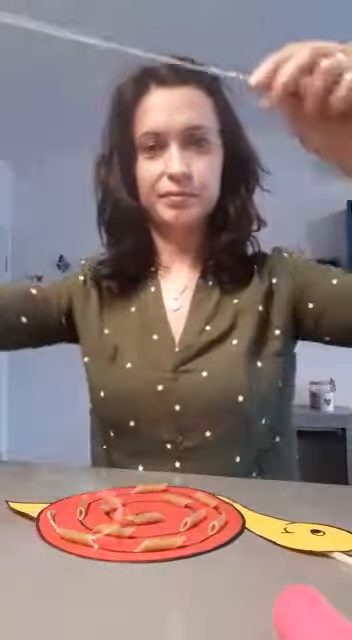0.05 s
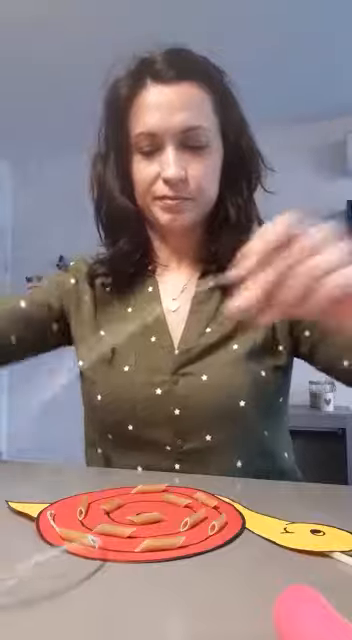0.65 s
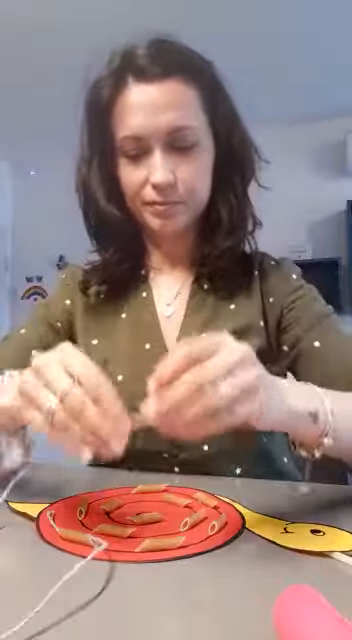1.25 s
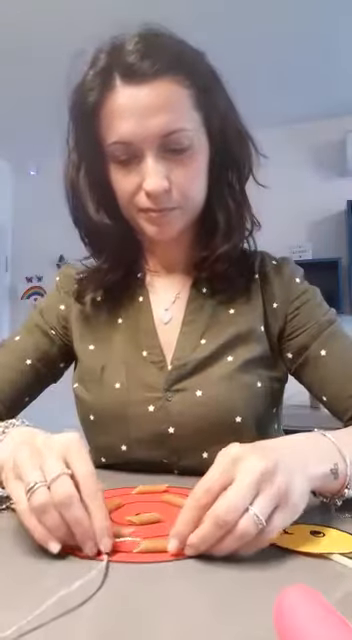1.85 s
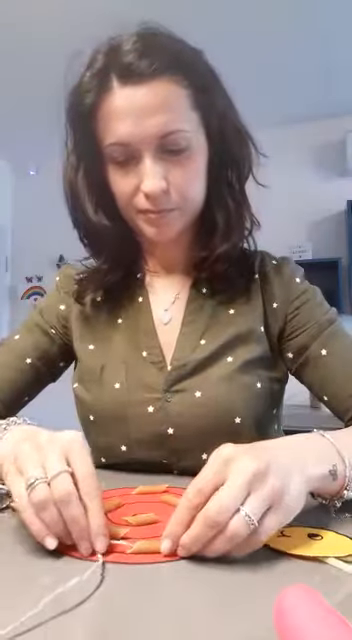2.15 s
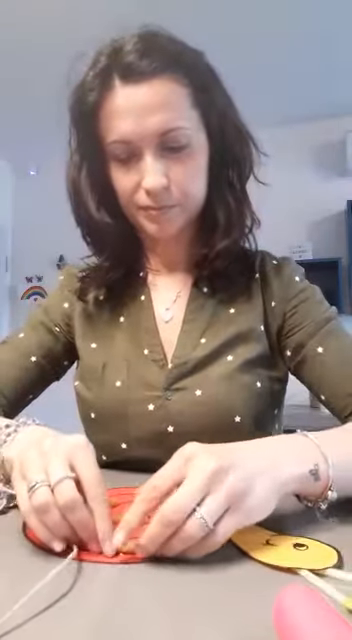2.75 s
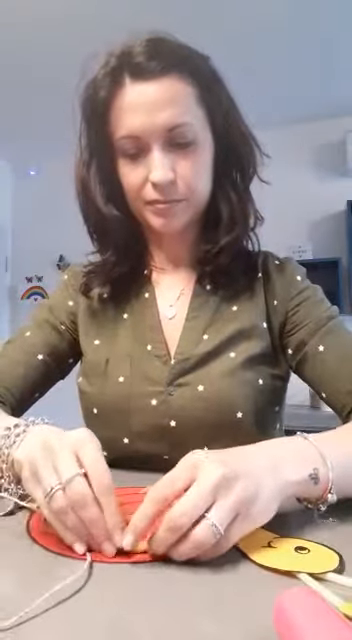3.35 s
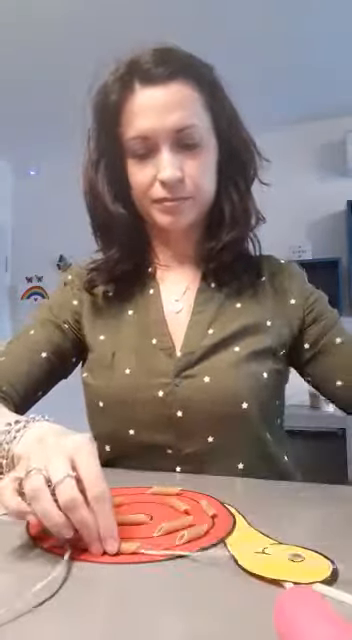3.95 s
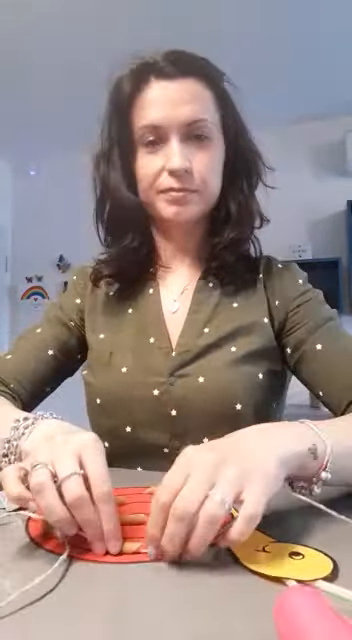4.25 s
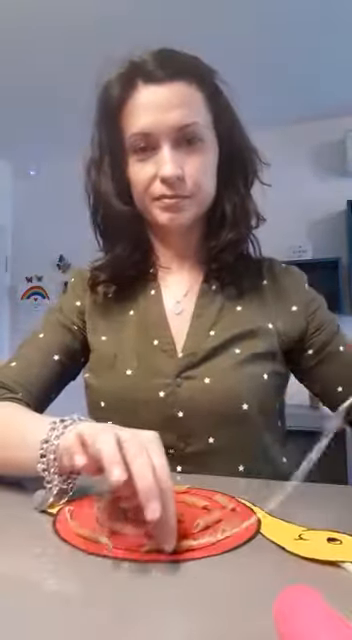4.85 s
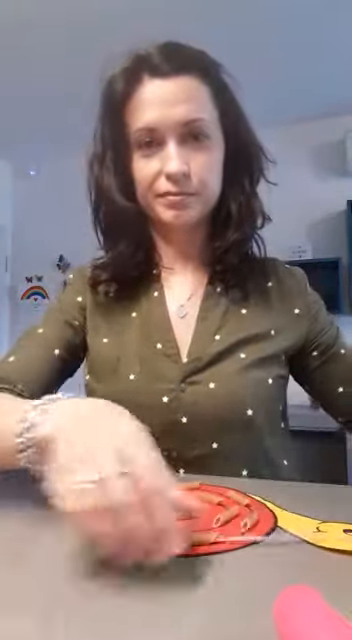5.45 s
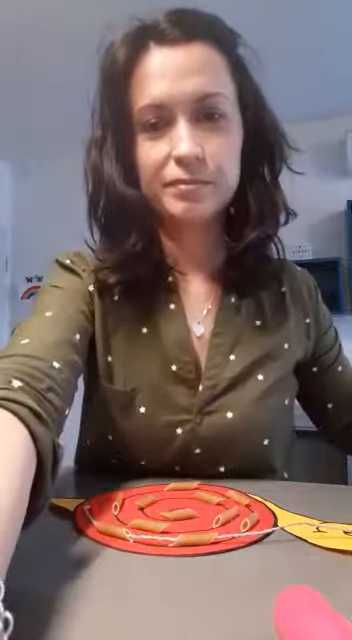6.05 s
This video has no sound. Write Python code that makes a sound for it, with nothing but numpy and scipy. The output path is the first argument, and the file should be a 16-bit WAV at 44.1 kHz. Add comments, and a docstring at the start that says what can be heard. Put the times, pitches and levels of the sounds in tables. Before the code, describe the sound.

In a small room with a faint hum, a phone on a table closely picks up string being drawn through dry pasta and the high tinkle of a charm bracelet. Beads and pasta rattle down on the tabletop, which rings briefly. A quieter stretch follows, with finger taps, rustling string and card rubbing with slight squeaks. Finally the bracelet jingles again and a louder clatter lands beside the microphone, settling in small bounces.

```python
"""String hisses through dry pasta tubes at arm's length, and the charms of a bracelet clink along.
Twice the wrists come down and beads and pasta clatter on the tabletop; in between, fingertips and
nails tap on a card and nudge the tubes while string and card slide. The microphone is a phone standing
close by on the table: its half-covered right port touches the top and picks up its ringing.
The room is small, with a short tail and a low appliance hum."""
import sys
import numpy as np
from scipy import signal
from scipy.fft import rfft, irfft
from scipy.io import wavfile
from scipy.ndimage import uniform_filter1d

SR = 44100
rng = np.random.default_rng(int(sys.argv[2]) if len(sys.argv) > 2 else 0)


def generate_wav(sig):
    """Save sig (samples, or channels by samples) to the path in sys.argv[1] as 16-bit PCM at SR."""
    pcm = np.round(np.clip(np.atleast_2d(sig).T, -1, 1) * 32767).astype(np.int16)
    wavfile.write(sys.argv[1], SR, pcm)


N = 269451
T = np.arange(N) / SR

# Levels in the tables are relative; each source and each port adds its own gain.
# hardest blows of beads and pasta on the tabletop: t/s, level/dB
BLOWS = [(1.4375, -3), (1.464, 0), (1.483, -6.5), (1.492, -5), (1.502, -2.5), (1.522, -8.5), (1.538, -4.5),
         (1.6, -14), (1.619, -19), (1.747, -21), (5.703, -2), (5.7091, 3), (5.7142, -1.5), (5.723, 0.5),
         (5.738, 6), (5.7783, 3), (5.821, -13.5), (5.847, -6.5), (5.985, -18.5)]
# fingertips and nails tapping on the card: t/s, level/dB, treble tilt/(dB per octave)
FINGER_TAPS = [(2.222, -41, 3.5), (2.348, -42, 6.5), (2.812, -38, 1), (2.92, -38, -1.5), (2.989, -33, -1.5),
               (3.097, -46.5, 10), (4.241, -39, 4), (4.3995, -30.5, 4.5), (4.473, -29, 2),
               (5.016, -30.5, 9), (5.316, -35.5, -1.5)]
# loose beads settling in weakening bounces: first t/s, last t/s, first level/dB, last level/dB
SETTLES = [(1.557, 1.664, -11.5, -23), (5.797, 5.99, -9.5, -19)]
# strong tabletop modes: f/Hz, t60/s, level struck far from the phone/dB, level struck near it/dB
TABLE_MODES = [(389.5, 0.27, -6.5, -3), (534, 0.26, -37, -1.5), (561.6, .22, -10, -2.5),
               (671, 0.11, 9.5, -10), (715, 0.15, -9.5, -5.5), (828.5, 0.17, -4.5, -8),
               (990, 0.036, -25, -3), (1085.6, 0.12, -1, -3), (1401, 0.12, -7, -9), (1760, 0.072, -7.5, 1),
               (1761, 0.14, 4, -5), (1819, 0.38, 1.5, -12), (1991, 0.034, -9, 8), (2619, 0.16, -3.5, -9.5),
               (4500, 0.17, -21, -24), (4780, 0.031, 7, 3.5), (5730, 0.067, -1, -38)]
# spectrum of the top's dense, weaker modes: f/Hz, level/dB
TABLE_BODY = [(100, -21), (220, -22), (400, -5.5), (700, 0), (1300, -10.5), (1800, -8.5), (2300, -9.5),
              (4000, -4.5), (5500, -11.5), (7000, -7.5), (11000, -14), (16000, -21.5)]
# two ring modes of each charm, by name: low f/Hz, high f/Hz, low mode level/dB
CHARM_MODES = {"large": (8747, 10661, -5), "medium": (8815, 10830, -12), "small": (9050, 11120, -4),
               "bell": (8672, 10700, 6)}
# clearest clinks, damped by the chain: t/s, tick level/dB, ring level/dB, t60/s, charm
CLINKS = [(0.1093, -28, -42.5, 0.11, "large"), (.1835, -14.5, -40.5, 0.27, "medium"),
          (.254, -17, -38, 0.094, "small"), (0.4295, -19.5, -29, 0.13, "large"),
          (0.8157, -16, -33.5, 0.031, "large"), (0.896, -12, -40.5, 0.2, "medium"),
          (1.0187, -1, -21.5, 0.16, "medium"), (1.0302, -4, -19, 0.2, "large"),
          (1.198, -9.5, -17.5, 0.029, "small"), (1.219, -13.5, -62, 0.16, "small"),
          (1.492, -34, -29, 0.068, "small"), (1.502, -27, -39, .18, "large"),
          (1.602, -11, -38, 0.15, "bell"), (1.878, -29, -79, 0.055, "medium"),
          (5.411, -15.5, -32, 0.29, "medium"), (5.561, -26, -48.5, 0.093, "small"),
          (5.648, -23, -52, 0.078, "medium"), (5.696, -6, -40, 0.16, "bell"),
          (5.7095, -11, -24.5, 0.11, "bell"), (5.75, -4, -25.5, 0.39, "small"),
          (5.788, 2, -31, 0.14, "bell")]
# chain rattling as a hand moves: start/s, end/s, link level/dB, jostled charm level/dB
RATTLES = [(0.822, 0.864, -40, -66), (0.943, 0.984, -39, -53), (1.531, 1.628, -54, -43),
           (5.8, 5.904, -28.5, -31.5)]
# tick of metal links, with the thud of the wrist: f/Hz, level/dB
LINK_TICK = [(50, -25), (120, -16), (500, -29.5), (1600, -25.5), (4000, -17), (7000, -15), (8800, 0),
             (9700, -11), (11000, -6), (13000, -5.5), (16000, -4.5)]
# string drawn through the tubes: start/s, end/s, level/dB
DRAWS = [(0.0, 0.196, -53.5), (.25, 0.486, -57), (0.822, 1.03, -53)]
# hiss of string inside a tube: f/Hz, level/dB
DRAW_HISS = [(300, -6.5), (800, -14.5), (2000, -7.5), (4500, -4), (7000, -0.5), (10000, 1), (12000, 6),
             (16000, 3.5)]
# the string's twist ticking over a rim: start/s, end/s, ridge rate at full speed/Hz, level/dB
TWISTS = [(0.053, 0.266, 296, -58.5), (0.373, .67, 362, -61)]
# swish of the sleeves: f/Hz, level/dB
SLEEVE_SWISH = [(50, -10), (120, 2), (300, 8), (550, -10), (800, -3.5), (1300, -24.5), (4000, -13.5)]
# strokes of string and fingers over the card: start/s, end/s, hiss level/dB, scrape level/dB
STROKES = [(1.716, 1.976, -71.5, -83), (2.125, 2.53, -68.5, -78), (2.626, 3.47, -70.5, -72),
           (3.411, 3.803, -54, -57), (3.947, 4.35, -67.5, -67), (4.345, 4.61, -55, -53.5),
           (4.443, 4.947, -56.5, -61), (4.757, 5.033, -53.5, -75), (5.094, 5.46, -67, -69)]
# hiss of string over card and table: f/Hz, level/dB
SLIDE_HISS = [(60, -26), (300, 0.5), (1000, -7), (3000, -5), (4400, -2.5), (5200, -1.5), (6500, -0.5),
              (8300, -2.5), (9500, -5.5), (12000, 1.5), (16000, -3.5)]
# scrape of the card, heard through the table: f/Hz, level/dB
CARD_SCRAPE = [(60, -27), (200, -17), (400, -16), (650, -2), (900, -10.5), (1300, 0), (1600, -8.5),
               (1770, 8.5), (2000, -24), (2600, -10), (3800, -0.5), (5500, -60), (9000, -2)]
# the card sticking and squeaking: start/s, end/s, level/dB
SQUEAKS = [(3.211, 3.335, -64), (3.467, 3.514, -62), (4.003, 4.173, -55.5), (4.428, 4.63, -56),
           (5.122, 5.223, -63.5)]
# fingertips pushing a tube a little way along the card: start/s, end/s, level/dB
SCUFFS = [(3.31, 3.375, -70.5), (4.253, 4.309, -61), (4.928, 5.013, -62.5)]
# their dull rub: f/Hz, level/dB
SCUFF_RUB = [(100, -33), (330, -4), (600, 2), (900, -12.5), (2000, -24.5), (6000, -40)]
# air noise of the room: f/Hz, level/dB
ROOM_AIR = [(25, -35), (60, -3), (95, -9), (125, 1), (200, -1.5), (310, 1), (500, -9), (800, -7.5),
            (1200, -16), (1650, -11), (2800, -17), (9000, -19.5), (15000, -67)]
# partials of an appliance's hum: f/Hz, level/dB
HUM = [(97, -76), (199, -75), (290, -74.5), (401, -77.5)]
# response of the half-covered right port: f/Hz, level/dB
RIGHT_PORT = [(60, -7), (300, -2), (700, 3), (1700, 6.5), (3000, -1.5), (5700, -1), (6600, -17.5),
              (10000, -22), (11000, -8.5), (15500, -4.5)]

STROKE_ATTACK_S, STROKE_RELEASE_S = 0.23, 0.5


def tabletop(crack_db=-12, body_db=-32, modes_db=-35, blow_tilt_db=2.13, near_after_s=5):
    """Each hit gives a crack, the top's dense ring and its strong modes; loose beads bounce after."""
    t = np.arange(SR // 2) / SR
    hz, t60, far_db, near_db = np.transpose(TABLE_MODES)[:, :, None]
    body = undb(body_db) * fade(t, 0.19) * pair(len(t), 0.96)  # the same top rings for every hit
    finger_damping = fade(t, 0.9)  # fingers stay on the card after a tap
    bass_cut = [(40, -22), (200, -5), (300, -6.5), (370, -1)]  # light objects give little bass
    blows = [(s, db, blow_tilt_db) for s, db in BLOWS]
    bounces = []
    for start, end, first_db, last_db in SETTLES:
        for s, luck in zip(uneven(start, end, gap_s=0.017), rng.standard_normal(40)):
            db = np.interp(s, [start, end], [first_db, last_db]) + 5 * luck
            bounces.append((s, db, blow_tilt_db))
    out = np.zeros((2, N))
    for hits, damping in [(blows, 1), (FINGER_TAPS, finger_damping), (bounces, 1)]:
        for s, db, tilt_db in hits:
            spot_db = near_db if s > near_after_s else far_db  # late hits land beside the phone
            mode_hz = hz * (1 + 0.0049 * rng.standard_normal(hz.shape))
            modes = undb(modes_db + spot_db) * fade(t, t60) * np.sin(2 * np.pi * mode_hz * t)
            crack = undb(crack_db) * fade(t, 0.049) * pair(len(t), 0.26)
            hit = shape(crack + body, TABLE_BODY) + modes.sum(axis=0)
            add(out, s, undb(db) * damping * shape(hit, bass_cut, tilt_db))
    return out


def bracelet(tick_db=-9, chatter_db=-21, neighbour_db=-12, detune=0.0072, jostle_t60_s=0.18):
    """Charms tick and the chain chatters; two high modes ring on, beating with their neighbours'."""
    t = np.arange(SR // 2) / SR
    shaking = sum(undb(db) * stroke(start, end, 0.015, 0.1) for start, end, db, _ in RATTLES)
    ticks = friction(440, 2.2, 0.3) * shaking
    tick_decay = fade(t, 0.012) + undb(chatter_db) * fade(t, 0.43)
    jostled = []
    for start, end, _, db in RATTLES:
        for s, charm in zip(uneven(start, end, gap_s=0.025), rng.choice(list(CHARM_MODES), size=40)):
            jostled.append((s, db + 2, db, jostle_t60_s, charm))
    rings = np.zeros((2, N))
    for s, hit_db, ring_db, t60, charm in CLINKS + jostled:
        low_hz, high_hz, low_db = CHARM_MODES[charm]
        ring = 0
        for hz, db in [(low_hz, low_db), (high_hz, 0)]:
            ring += undb(db) * np.sin(2 * np.pi * (hz * t + rng.random((2, 1))))
            for neighbour_hz in hz * (1 + detune * rng.standard_normal(2)):
                cycles = neighbour_hz * t + rng.random((2, 1))
                ring += undb(db + neighbour_db) * np.sin(2 * np.pi * cycles)
        add(rings, s, undb(ring_db) * ring * fade(t, t60))
        add(ticks, s, undb(tick_db + hit_db) * pair(len(t), 0.14) * tick_decay)
    return rings + shape(ticks, LINK_TICK)


def drawn_string(hiss_db=6, sleeve_db=-62, attack_s=0.004, follow_through_s=0.15, slowing=0.11):
    """At arm's length string hisses through the tubes, its twist buzzes and the sleeves swish on."""
    pull = sum(undb(db) * stroke(start, end, attack_s, 0.1) for start, end, db in DRAWS)
    arms = np.max([stroke(start, end + follow_through_s, attack_s, 1.0)
                   for start, end, _ in DRAWS], axis=0)
    hiss = unit(shape(friction(9900, 1.5, 0.24), DRAW_HISS)) * pull
    sleeve = unit(shape(pair(N, 1.0), SLEEVE_SWISH)) * arms
    buzz = 0
    for start, end, hz, db in TWISTS:
        arch = np.sin(np.pi * np.clip((T - start) / (end - start), 0, 1))  # speeds up, then slows
        ridge_hz = hz * (1 - slowing * (1 - arch)) * (1 + 0.0466 * walk(90.3))
        ridges = np.cumsum(ridge_hz) / SR
        buzz += np.sin(2 * np.pi * ridges) * arch * undb(db + 1.6 * walk(40.5))
    return undb(hiss_db) * hiss + undb(sleeve_db) * sleeve + buzz


def sliding_string(hiss_db=7, flutter_db=1.3):
    """Fibres rub over card and table, close to the microphone."""
    hiss = unit(shape(friction(9000, 2.2, 0.3), SLIDE_HISS))
    speed = np.max([undb(db) * stroke(start, end, STROKE_ATTACK_S, STROKE_RELEASE_S)
                    for start, end, db, _ in STROKES], axis=0)
    return hiss * speed * undb(hiss_db + flutter_db * walk(35))


def sliding_card(scrape_db=-5, squeak_db=-12, squeak_hz=1770, squeak_width_hz=45, catch_db=1.5):
    """The card sticks and slips under the fingers, shaking the top and above all its main mode."""
    slips = friction(1500, 2.9, 0.37) * undb(catch_db * walk(45))
    scrape = unit(shape(slips, CARD_SCRAPE))
    main_mode = signal.iirpeak(squeak_hz, squeak_hz / squeak_width_hz, fs=SR)
    squeak = unit(signal.lfilter(*main_mode, friction(2500, 0.59, 0.91)))
    pressure = np.max([undb(db) * stroke(start, end, STROKE_ATTACK_S, STROKE_RELEASE_S)
                       for start, end, _, db in STROKES], axis=0)
    sticking = sum(undb(db) * stroke(start, end, 0.015, 0.18) for start, end, db in SQUEAKS)
    return undb(scrape_db) * scrape * pressure + undb(squeak_db) * squeak * sticking


def fingertips(scuff_db=-4, attack_s=0.01, release_s=0.2):
    """Soft pads push the tubes along; the rub passes into the table."""
    push = sum(undb(db) * stroke(start, end, attack_s, release_s) for start, end, db in SCUFFS)
    return undb(scuff_db) * unit(shape(friction(900, 1.2, 0.86), SCUFF_RUB)) * push


def room_tail(x, wet_db, onset_s, t60_s=0.45, treble_t60_s=0.33):
    """The small room adds a diffuse tail that builds up quickly; the treble dies first."""
    t = np.arange(SR) / SR
    noise = rng.standard_normal((2, SR))
    low = signal.sosfiltfilt(signal.butter(2, 6500, fs=SR, output="sos"), noise)
    build_up = 1 - np.exp(-(t / onset_s) ** 2)
    tail = (low * fade(t, t60_s) + (noise - low) * fade(t, treble_t60_s)) * build_up
    return x + undb(wet_db) * signal.fftconvolve(x, unit(tail) / np.sqrt(SR), axes=-1)[:, :N]


def room_tone(air_db=-68, waver_db=4.5):
    """Behind everything lie low steady air noise and an appliance's wavering hum."""
    hum = sum(undb(db - waver_db * walk(16)) * np.sin(2 * np.pi * hz * T + 0.5 * walk(2))
              for hz, db in HUM)
    return undb(air_db) * unit(shape(pair(N, 0.69), ROOM_AIR)) + hum


def friction(slips_per_s, spread_db, alike):
    """Dense tiny slips of uneven size, at both ports."""
    slipping = rng.random(N) < slips_per_s / SR
    sizes = undb(spread_db * np.minimum(rng.exponential(size=N), 5))
    return unit(slipping * sizes * pair(N, alike))


def stroke(start, end, attack_s, release_s):
    """Envelope of a hand movement: it gathers speed, holds, and dies away after its end."""
    rise = np.sin(np.pi / 2 * np.clip((T - start) / attack_s, 0, 1)) ** 2
    return rise * fade(np.maximum(T - end, 0), release_s)


def uneven(start, end, gap_s):
    """Times from start to end, about gap_s apart."""
    times = start + gap_s * np.append(0, np.cumsum(1 + 0.5 * rng.uniform(-1, 1, size=40)))
    return times[times < end]


def pair(count, alike):
    """Noise at the two ports; alike is the share of power they have in common."""
    common = np.sqrt(alike) * rng.standard_normal(count)
    return common + np.sqrt(1 - alike) * rng.standard_normal((2, count))


def walk(rate_hz):
    """Smooth random wander of spread about 1."""
    step = int(SR / rate_hz)
    stairs = np.repeat(rng.standard_normal(N // step + 1), step)[:N]
    return unit(uniform_filter1d(stairs, step))


def shape(x, points, tilt_db=0, size=2048):
    """Causal filter through (f/Hz, level/dB) points, tilted by tilt_db per octave about 1.5 kHz."""
    log_hz = np.log2(np.maximum(np.fft.rfftfreq(size, 1 / SR), 20))
    hz, db = np.transpose(points)
    octaves = np.maximum(log_hz - np.log2(1500), -2)
    gain = undb(np.interp(log_hz, np.log2(hz), db) + tilt_db * octaves)
    cepstrum = irfft(np.log(gain))
    cepstrum[1:size // 2] *= 2  # fold to minimum phase
    cepstrum[size // 2 + 1:] = 0
    response = irfft(np.exp(rfft(cepstrum)))
    return signal.fftconvolve(x, np.array(response, ndmin=x.ndim), axes=-1)[..., :x.shape[-1]]


def fade(t, t60):
    """Exponential decay, 60 dB down at t60."""
    return np.exp(-np.log(1000) * t / t60)


def add(out, s, x):
    """Mix x in at time s."""
    i = int(s * SR)
    out[..., i:i + x.shape[-1]] += x[..., :max(N - i, 0)]


def undb(db):
    """Decibels to gain."""
    return 10 ** (np.asarray(db) / 20)


def unit(x):
    """Scale to rms 1."""
    return x / np.sqrt(np.mean(x ** 2))


def scene(left_lag_s=0.0004):
    """Airborne sound reaches both ports; the table shakes the right one directly, with little room."""
    clatter = room_tail(tabletop(), wet_db=[[-2], [-11]], onset_s=0.028)  # [[left], [right]]
    rubbing = sliding_card() + fingertips()
    table = clatter * undb([[-6.5], [6]]) + rubbing * undb([[1], [12]])
    table[0] = np.roll(table[0], int(left_lag_s * SR))  # later through the air than through the top
    air = room_tail(bracelet(), wet_db=-6, onset_s=0.0068) + drawn_string() + sliding_string()
    return table + air + room_tone()


def record(dry, top_hz=15900):
    """The phone on the table: its half-covered right port loses treble; both ports cut off at top_hz."""
    ports = np.array([dry[0], shape(dry[1], RIGHT_PORT)])
    return signal.sosfilt(signal.ellip(8, 0.2, 70, top_hz, fs=SR, output="sos"), ports)


dry = scene()
out = record(dry)
generate_wav(out)
```